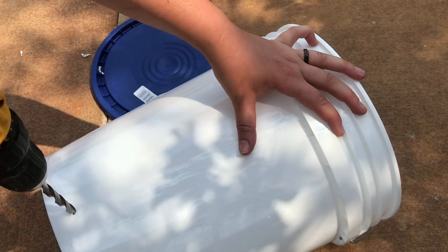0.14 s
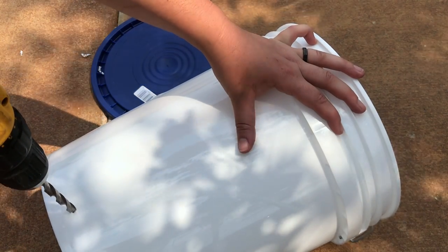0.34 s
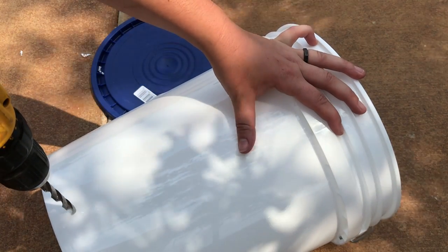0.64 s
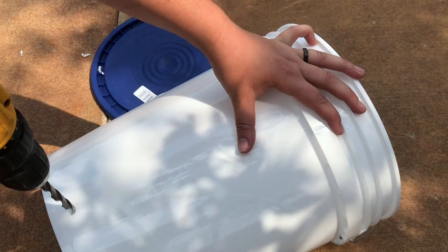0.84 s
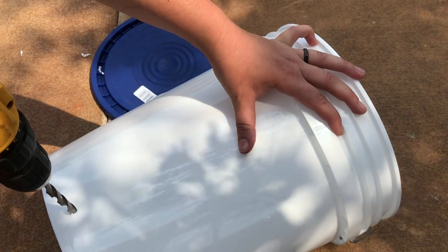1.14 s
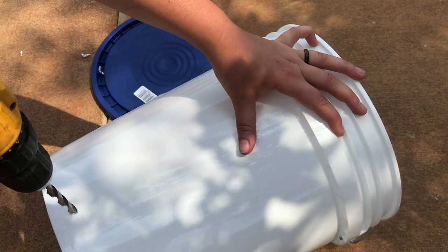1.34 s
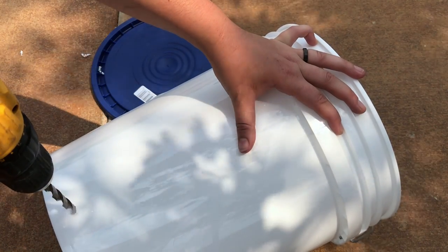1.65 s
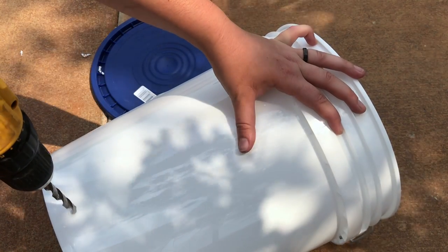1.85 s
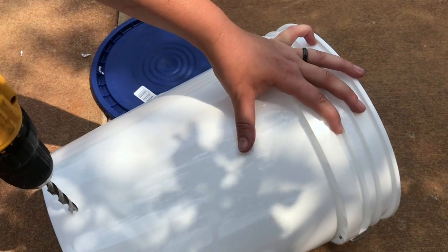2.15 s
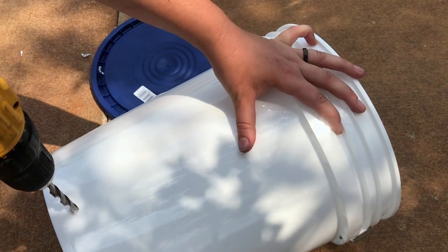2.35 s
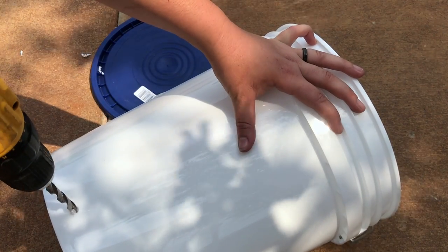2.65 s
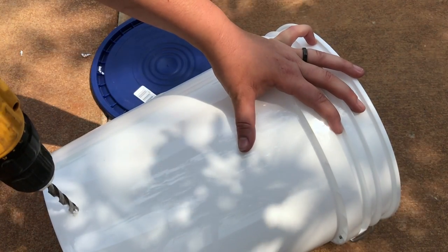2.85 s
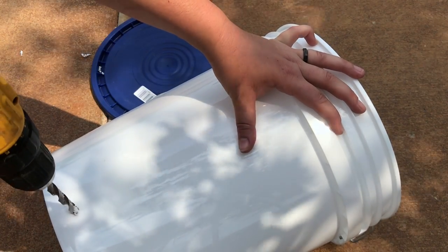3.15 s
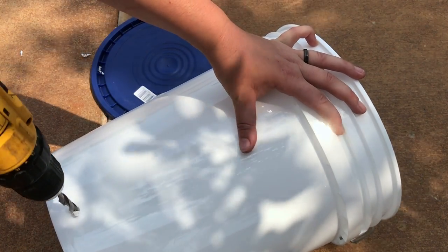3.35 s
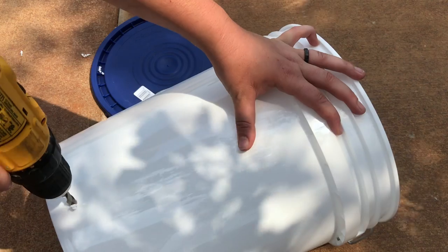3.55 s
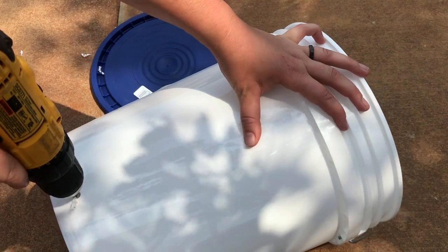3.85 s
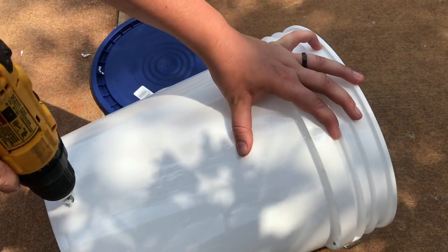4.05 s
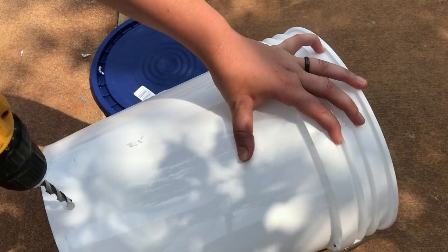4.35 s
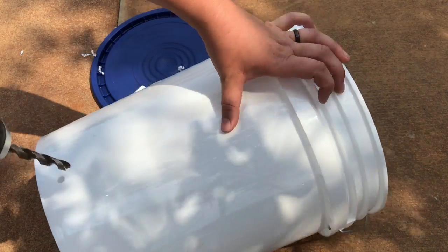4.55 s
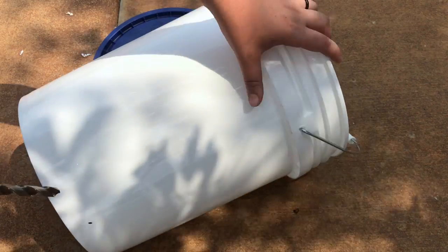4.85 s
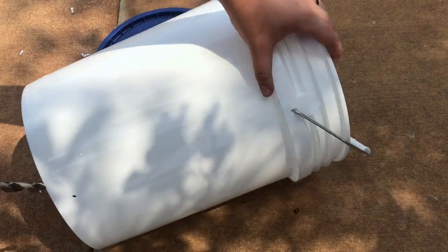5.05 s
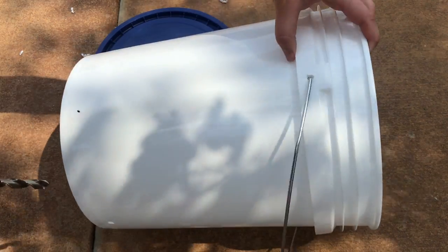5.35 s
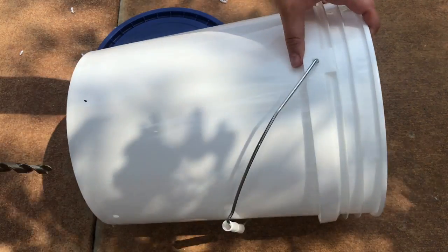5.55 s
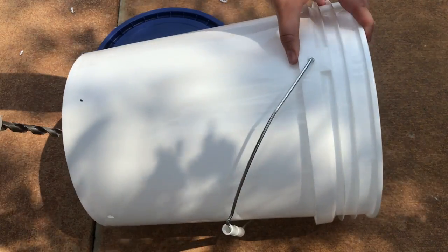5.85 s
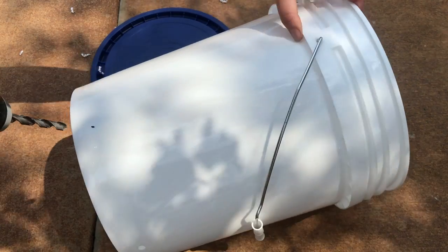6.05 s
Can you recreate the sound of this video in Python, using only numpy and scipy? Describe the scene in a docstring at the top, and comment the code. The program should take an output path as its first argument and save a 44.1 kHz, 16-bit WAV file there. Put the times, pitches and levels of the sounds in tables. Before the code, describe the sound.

Outdoors in buffeting wind, a drill's high whine bites through plastic and stops, followed by a short squeak, gritty scraping and hollow bucket knocks.

```python
"""On a patio, one microphone in buffeting wind: a cordless drill bores through a plastic bucket's wall.
Tones locked to the rotor whine, sag as the bit bites and coast to a stop, over coloured gear and brush noise.
The bit breaks through, snags, and squeaks in gliding sines as it is drawn back out.
Then the bucket rolls over gritty concrete, a stream of random grains, and its rim and wire handle clatter
as noise bursts with ringing modes. The wind is low noise swelling in gusts over a quiet yard."""
import sys
import numpy as np
from scipy import signal
from scipy.fft import rfft, irfft
from scipy.io import wavfile
from scipy.ndimage import uniform_filter1d, map_coordinates

SR = 44100
rng = np.random.default_rng(int(sys.argv[2]) if len(sys.argv) > 2 else 0)


def dump(signal):
    """Clip the signal to [-1, 1] and save it as 16-bit WAV at the path in sys.argv[1]."""
    limited = np.clip(np.atleast_2d(signal).T, -1, 1)
    pcm = np.round(limited * 32767).astype(np.int16)
    wavfile.write(sys.argv[1], SR, pcm)


N = 272979
T = np.arange(N) / SR  # time in seconds

# cycles of the whine, and meetings of the first gear's teeth, per turn of the rotor
SLOTS, MESH_ORDER = 12, 13.1
RELEASE_S = 4.08  # the trigger is let go
# motor speed while the trigger is held, as the pitch of its whine: start_s [s], pitch_hz [Hz]
SPEED = [(0, 1361), (.12, 1482), (.25, 1562), (.55, 1642), (.8, 1689), (1.25, 1728), (1.5, 1713),
         (1.92, 1696), (2.08, 1654), (2.34, 1462), (2.67, 1471), (3.05, 1342), (3.26, 1185), (3.35, 1303),
         (3.47, 1356), (3.88, 1296), (3.97, 1346), (4.08, 1518)]
# resonances of the drill housing: centre_hz [Hz], width_hz [Hz], height_db [dB]
HOUSING = [(1030, 190, 4.5), (1457, 180, 4), (2260, 380, 5), (3280, 480, 5.5), (4870, 1400, 8),
           (9060, 1150, 8)]


def amp(db):
    """Decibels to gain."""
    return 10 ** (np.asarray(db) / 20)


def unit(x):
    """Scales to an rms of one."""
    return x / np.sqrt(np.mean(x ** 2) + 1e-20)


def follow(table):
    """The columns of a time table, interpolated sample by sample."""
    s, *columns = np.transpose(table)
    return [np.interp(T, s, column) for column in columns]


def colour(x, points, bumps=()):
    """Minimum-phase filter of unit power from a dB spectrum and optional resonances (Hz, width Hz, dB)."""
    size = 8192
    hz = np.fft.rfftfreq(size, 1 / SR)
    point_hz, level_db = np.transpose(points)
    db = np.interp(np.log(hz + 1), np.log(point_hz + 1), level_db)
    for centre, width, height in bumps:
        db = db + height / (1 + (2 * (hz - centre) / width) ** 2)
    log_gain = np.log(amp(np.r_[db, db[-2:0:-1]]))
    # the Hilbert transform of the log gain gives the phase that keeps the filter causal
    response = np.exp(np.conj(signal.hilbert(log_gain)))[:len(hz)]
    taps = irfft(response)[:size // 2]
    return signal.oaconvolve(x, taps / np.linalg.norm(taps))[:len(x)]


def wander(hz):
    """Smooth random drift of unit rms, holding only rates below hz."""
    slow = np.fft.rfftfreq(N, 1 / SR) < hz
    return unit(irfft(rfft(rng.standard_normal(N)) * slow, N))


def steadied(x, span_s):
    """Evens out the swells of a noise that are longer than the span."""
    power = uniform_filter1d(x ** 2, max(int(span_s * SR), 2))
    return x / np.sqrt(abs(power) + 1e-9)


def add(mix, s, sound):
    """Mixes a sound in at a time in seconds."""
    part = mix[round(s * SR):][:len(sound)]
    part += sound[:len(part)]


def burst(t, t60):
    """A dying spray of tiny contacts: noise that falls 60 dB in t60 seconds."""
    return rng.standard_normal(len(t)) * amp(-60 * t / t60)


def motor_state():
    """Rotor turns, then shares 0-1: speed left while coasting, load read from the sagging pitch, plunge."""
    free_hz, sag_hz = 1770, 443  # whine with no load, and its drop at full load
    coast_s = .5  # friction stops the rotor in this time
    through_s, plunge_s = 3.23, 0.17  # the bit breaks through; time constant of the drill plunging nearer
    hz = follow(SPEED)[0]
    spin = 1 - np.clip((T - RELEASE_S) / coast_s, 0, 1)
    unsteady = 1 + 0.001033 * wander(43.4)
    turns = np.cumsum(hz * spin * unsteady) / SR / SLOTS
    load = np.clip((free_hz - hz) / sag_hz, 0, 1)
    plunge = 1 - np.exp(-np.maximum(T - through_s, 0) / plunge_s)
    return turns, spin, load, plunge


def tone_levels(spin, load, plunge):
    """Gains of whine, mesh and overtones: load softens, the plunge swells the mesh, cutting hardens it."""
    # how hard the flutes cut, through the wall and then reaming the hole: start_s [s], cut [share 0-1]
    cutting = [(0, 0), (2.0, 0.18), (2.25, 0.42), (3.0, 0.26), (3.23, 1), (3.36, 0.15), (3.55, 0.14),
               (3.88, 0.98), (4.08, 0.2)]
    cut = follow(cutting)[0]
    stopping = 1 - spin
    # the mesh overtone blooms as it glides through a resonance of the housing
    centre, width, _ = HOUSING[3]
    overtone_hz = 2 * follow(SPEED)[0] * MESH_ORDER / SLOTS
    bloom_db = 8 / (1 + ((overtone_hz - centre) / width) ** 2)
    whine_db = -41.0 - 5.5 * load - 3 * cut - 22 * stopping
    # without torque the teeth meet softly
    mesh_db = -56 - 4 * load + 13 * plunge - 50 * stopping
    overtone_db = -64 + 14 * cut + bloom_db + 2 * wander(12) - 50 * stopping
    return [spin * amp(db) for db in (whine_db, mesh_db, overtone_db)]


def tones(turns, levels, rough=0.09, mesh_rough=0.29):
    """Slot whine, fan and rotor orders, and the rougher mesh of the first gear stage, as sines of rotor angle."""
    # tones of the spinning rotor and its fan: order [cycles per turn], level_db [dB re the whine gain]
    rotor = [(3, -20), (5, -10), (7, -21), (13, -26), (30, -19.5), (35, -27), (40, -21)]
    whine, mesh, overtone = levels

    def tone(cycles, shake):
        """A sine of unit rms with a random phase and an unsteady level."""
        return np.sqrt(2) * np.sin(2 * np.pi * (cycles + rng.random())) * (1 + shake * wander(50))

    out = whine * amp(-1) * tone(SLOTS * turns, rough)
    for order, db in rotor:
        out += whine * amp(db) * tone(order * turns, rough)
    teeth = MESH_ORDER * turns + 0.039 * wander(140)  # backlash jitters the teeth
    for harmonic, gain in enumerate([mesh * amp(-1), overtone, overtone * amp(-7)], 1):
        out += gain * tone(harmonic * teeth, mesh_rough)
    return out


def rattle(turns, spin, load):
    """Gears and brushes: a roughness that repeats each turn, loose chatter, hiss and a flickering squeal."""
    # noises before the trims below: start_s [s], gear_db [dB], hiss_db [dB], squeal_db [dB]
    running = [(0, -43.5, -59, -60), (.5, -42, -54, -54), (1.35, -42, -56, -53), (2.2, -40, -54, -54),
               (2.5, -41, -57, -57), (3.05, -41, -57, -59), (3.23, -39.5, -58, -60), (3.29, -46, -61, -63),
               (3.42, -42, -61, -67), (3.7, -41, -56, -86), (4.08, -42, -51.5, -59)]
    # gear rattle spinning freely: pitch_hz [Hz], density_db [dB per Hz]
    free = [(250, -26.5), (500, -12.5), (780, -7.5), (970, -12), (1520, -5), (1970, -6), (2980, -10.5),
            (4120, -14.5), (6390, -18.5), (8830, -19.5), (11000, -38), (15000, -46)]
    # gear rattle under load: pitch_hz [Hz], density_db [dB per Hz]
    loaded = [(250, -6.5), (500, -7.5), (670, -7), (1100, -8.5), (1500, -4.5), (2000, -3.5), (3500, -11.5),
              (4810, -10.5), (6560, -13), (8940, -14), (11000, -26.5), (15000, -25)]
    gear_db, hiss_db, squeal_db = follow(running)

    size = 256  # points of roughness around one turn
    profile = rng.standard_normal(size)
    worn = unit(map_coordinates(profile, [turns % 1 * size], order=3, mode="grid-wrap"))
    beat = 1 + 0.17 * np.sin(2 * np.pi * turns) + 0.12 * wander(120)
    repeating = amp(-8) * worn * (1 + 0.55 * wander(15))
    chatter = unit(beat * rng.standard_normal(N) + repeating)
    gears = (1 - load) * colour(chatter, free, HOUSING) + load * colour(chatter, loaded, HOUSING)

    hiss = colour(beat * rng.standard_normal(N), [(7000, -51), (10000, 1.5), (13000, 4.5), (15700, -17.0)])
    squeal = colour(rng.standard_normal(N), [(9000, -43), (14300, -23)], [(14300, 1100, 25)])
    squeal = unit(squeal * amp(3 * wander(110)))
    unpowered_db = -4 * np.clip((T - RELEASE_S) / .03, 0, 1)  # no current, fewer sparks
    # each noise dies at its own rate as the rotor slows
    out = spin ** 1.28 * amp(gear_db) * gears
    out += spin ** 1.9 * amp(hiss_db + unpowered_db - 1) * hiss
    return out + spin ** 1.5 * amp(squeal_db + 1) * squeal


def chopper():
    """The speed controller switches the current and sings at a fixed pitch while the trigger is held."""
    # the switching tones: pitch_hz [Hz], level_db [dB re each other]
    partials = [(3909, 0), (7818, -12), (11727, -25)]
    # level of the whole song: start_s [s], level_db [dB]
    switching = [(0, -48.5), (.4, -52), (2, -51), (2.45, -54.5), (3.2, -57), (3.4, -52.5), (4.07, -46)]
    held = np.clip((RELEASE_S - T) / 0.009, 0, 1)
    song = sum(amp(db) * np.sin(2 * np.pi * hz * T) for hz, db in partials)
    return held * amp(follow(switching)[0]) * unit(song) * (1 + 0.049 * wander(40))


def ring(t, detune=0.0046):
    """The bucket's decaying modes, weighted and slightly bent anew by every place of impact."""
    # the bucket's modes: pitch_hz [Hz], level_db [dB re each other], t60_s [s]
    modes = [(441, 3, 0.19), (646, -10, 0.39), (813, 2, 0.16), (855, -13, 0.03), (950, -5, 0.13),
             (1133, -6.5, 0.047), (1275, 2, .06), (1419, 6.5, 0.089), (1510, -12, 0.059),
             (1750, -17, 0.088), (2169, 4, 0.038), (2360, -14.5, 0.034), (2350, -19, 0.089),
             (2660, 1, 0.057), (3270, -2.5, 0.069), (10100, -21.5, 0.067), (14800, -34, .06)]
    hz, db, t60 = np.transpose(modes)[:, :, None]
    weight = rng.choice([-1, 1], hz.shape) * rng.uniform(0.18, 1.13, hz.shape)
    bent_hz = hz * (1 + detune * rng.standard_normal(hz.shape))
    partials = weight * amp(db - 60 * t / t60) * np.sin(2 * np.pi * bent_hz * t)
    return partials.sum(0) / np.linalg.norm(amp(db))


def snags():
    """The bit's flutes catch the edge of the hole: the wall snaps, flexes in a low thump and rings."""
    # the catches: start_s [s], level_db [dB], thump_db [dB re level]
    catches = [(3.221, -39, -15), (3.247, -27, 4), (4.076, -26.5, -4), (4.082, -23, 19.5), (4.091, -33, 9)]
    # colour of the snap: pitch_hz [Hz], density_db [dB per Hz]
    snap_colour = [(200, -25.5), (450, 13), (650, -1), (850, 9), (1100, -13), (1550, 8.5), (2200, -8.5),
                   (3500, -2.5), (5000, -4.5), (7000, -13), (10000, -23), (15000, -28)]
    thump_hz, thump_t60 = 240, 0.015
    out, t = np.zeros(N), T[:SR // 4]
    for s, db, thump_db in catches:
        snap = colour(burst(t, t60=0.031), snap_colour)
        thump = amp(thump_db - 60 * t / thump_t60) * np.sin(2 * np.pi * thump_hz * t)
        add(out, s, amp(db) * (snap + thump + amp(-6) * ring(t)))
    return out


def squeaks(jitter=0.095):
    """The flutes slip on plastic as they slide out of the hole: short, unsteady glides."""
    # the glides: start_s [s], length_s [s], from_hz [Hz], to_hz [Hz], level_db [dB]
    glides = [(4.229, .07, 807, 1090, -46), (4.291, 0.0695, 1144, 842, -44)]
    out = np.zeros(N)
    for s, length, from_hz, to_hz, db in glides:
        u = np.linspace(0, 1, int(length * SR))
        hz = (from_hz + (to_hz - from_hz) * u) * (1 + jitter * wander(200)[:len(u)])
        add(out, s, amp(db) * np.sin(np.pi * u) * np.sin(2 * np.pi * np.cumsum(hz) / SR))
    return out


def knocks(chips=.35):
    """Rim and handle strike the wall and rebound once: a chattering crack, then the hollow ring."""
    # the blows: start_s [s], level_db [dB], treble_db [dB, a broad lift or cut at 9 kHz]
    blows = [(4.326, -32, -21), (4.576, -41, -20), (4.684, -36.5, -5), (4.733, -33.5, -24),
             (4.79, -39.5, 8), (4.907, -37, 6), (4.944, -46, 2), (5.015, -33.5, -16), (5.083, -37, -5),
             (5.153, -41, 8), (5.228, -39, 1), (5.451, -44.5, -3), (5.504, -23.5, 3), (5.525, -18, 18),
             (5.535, -20, 10), (5.554, -17, 17), (5.568, -14.5, 7), (5.589, -24.5, -6), (5.64, -37, -4),
             (5.667, -34.5, -6), (5.786, -37, 9), (5.979, -30, 6), (5.997, -21.5, 3), (6.012, -19.5, 6),
             (6.038, -23.5, 19), (6.11, -40, 27)]
    # colour of a blow on the wall: pitch_hz [Hz], density_db [dB per Hz]
    wall = [(150, -22), (450, -2.5), (620, -13), (880, 10), (1150, 2.5), (1500, 8), (1950, -3.5),
            (2450, 1.5), (3150, -12.5), (3700, -12), (6000, -34), (10000, -46), (15000, -38.5)]
    rebound_s, rebound_db = .009, -13.5
    out, t = np.zeros(N), T[:SR // 4]
    for s, db, treble_db in blows:
        # random resonances colour each blow by where it lands
        place = [(hz, hz / 5, 3 * rng.standard_normal()) for hz in rng.uniform(880, 4660, size=6)]
        bumps = [(9000, 8100, treble_db)] + place
        for delay, drop_db in [(0, 0), (rebound_s, rebound_db)]:
            contacts = rng.random(len(t)) < chips  # share of samples in contact
            crack = colour(burst(t, t60=0.044) * contacts / np.sqrt(chips), wall, bumps)
            add(out, s + delay, amp(db + drop_db) * amp(-3) * (crack + ring(t)))
    return out


def ticks():
    """Small hard contacts, each with one short ring and a spray of noise."""
    # the contacts: start_s [s], level_db [dB], pitch_hz [Hz], t60_s [s]
    contacts = [(3.135, -35, 1880, 0.13), (4.5193, -35.5, 2850, 0.016), (4.793, -40, 3650, 0.013),
                (5.97, -49, 8350, 0.01)]
    out, t = np.zeros(N), T[:SR // 4]
    for s, db, hz, t60 in contacts:
        ping = amp(-60 * t / t60) * np.sin(2 * np.pi * hz * t)
        add(out, s, amp(db) * (ping + 0.31 * burst(t, t60=0.0098)))
    return out


def scraping(sag_db_per_s=20, release_db_per_s=230, bite_s=.004):
    """Gains of grind, rasp and fizz: each scrape bites, sags and lets go, over the light roll of the rim."""
    # scrapes of the rim on concrete, with the handle's rasp on the wall, before rolling()'s trims: start_s [s],
    # length_s [s], level_db [dB], rasp_db [dB re level], fizz_db [dB re level]
    scrapes = [(4.523, 0.1, -56.5, -15, -6.5), (4.73, 0.012, -40.5, -11, -23),
               (4.94, 0.043, -43.5, -7, -27), (5.034, 0.054, -43, -11, -26), (5.117, 0.07, -47.5, -16, -13),
               (5.214, 0.11, -41, -21, -16.5), (5.513, 0.025, -32.5, 5, -12.5),
               (5.744, 0.058, -42, -9, -19), (5.967, 0.041, -36, -13, -16.5)]
    # the roll sets in with the first scrape
    roll = amp(-64) * np.clip((T - scrapes[0][0]) / bite_s, 0, 1)
    power = np.outer(amp([0, -8, -16]), roll) ** 2
    for s, length, db, rasp_db, fizz_db in scrapes:
        t = np.maximum(T - s, 0)
        falling_db = sag_db_per_s * t + release_db_per_s * np.maximum(t - length, 0)
        stroke = np.minimum(t / bite_s, 1) * amp(db - falling_db)
        power += np.outer(amp([0, rasp_db, fizz_db]), stroke) ** 2
    return np.sqrt(power)


def rolling(grains_per_s=1000):
    """Grit crunches under the rolling rim and the handle rubs the wall; both sound through the bucket."""
    # colour of the rim grinding on concrete: pitch_hz [Hz], density_db [dB per Hz]
    grit = [(200, 8.5), (450, 12.5), (680, 6), (850, 20.5), (1100, 5), (1400, 16), (1900, 4.5),
            (2650, -35.5), (3100, -12), (3600, -25), (5500, -36), (15000, -55.5)]
    # colour of the grit's fizz: pitch_hz [Hz], density_db [dB per Hz]
    fizz_colour = [(1500, -2.5), (4000, 1.5), (6500, -4.5), (10000, -15), (15000, -21)]
    rasp_hz, rasp_width_hz = 2570, 780  # the handle's rasping resonance as it rubs the wall

    size = amp(1.5 * np.minimum(rng.exponential(1, N), 4)) * rng.choice([-1, 1], N)
    grains = size * (rng.random(N) < grains_per_s / SR)
    grains = steadied(grains, 0.02) * amp(3.5 * wander(45))  # uneven scuffing

    hollow = signal.oaconvolve(grains, ring(T[:SR // 4]))[:N]
    body = unit(colour(grains, grit)) + amp(-5) * unit(hollow)
    edges = [rasp_hz - rasp_width_hz / 2, rasp_hz + rasp_width_hz / 2]
    rasp = signal.sosfilt(signal.butter(4, edges, "bandpass", fs=SR, output="sos"), grains)
    fizz = colour(signal.oaconvolve(grains, burst(T[:SR // 20], t60=0.017))[:N], fizz_colour)

    grind, rasping, gritty = scraping()
    return amp(1) * (grind * unit(body) + rasping * unit(rasp) + gritty * amp(-2) * unit(fizz))


def wind(flutter_db=-29, flutter_slope=1.82, stiff_breeze_db=-22, core=0.67):
    """Eddies on the microphone: a breeze that flutters more as it grows, and brief gusts, over the quiet yard."""
    # the steady breeze, before its eddies: start_s [s], level_db [dB]
    steady = [(0, -35.5), (1.2, -34.5), (2.3, -27.5), (2.9, -32.5), (3.7, -31.5), (4.1, -24.5),
              (4.52, -25.5), (4.7, -21.5), (6.19, -23.5)]
    # gusts: peak_s [s], length_s [s, at half power], rumble_db [dB], flutter_db [dB re rumble]
    gusts = [(0.403, 0.037, -32, -13), (0.64, 0.073, -27, -13.5), (.928, 0.051, -21, -9.5),
             (1.275, 0.033, -31, -3.5), (1.414, 0.095, -26.5, -7.5), (1.775, 0.071, -18.5, -13.5),
             (1.968, .04, -19.5, -14), (2.032, 0.046, -20, -4.5), (2.156, 0.075, -26, 1.5),
             (2.284, 0.04, -25, -12), (2.447, 0.043, -21.5, -8.5), (2.805, 0.031, -23, -9),
             (3.115, 0.037, -19, -7.5), (3.339, 0.053, -25, -5), (3.52, 0.098, -24, -10),
             (3.738, 0.022, -21.5, -11.5), (3.884, 0.055, -20.5, -2.5), (3.99, 0.038, -15.5, -8),
             (4.252, 0.055, -19, -9), (4.464, 0.02, -26, -5), (5.131, 0.054, -22, 3),
             (6.006, 0.052, -18, -6), (6.137, 0.029, -15.5, -10)]
    # colours of the low rumble, the flutter and the yard, each: pitch_hz [Hz], density_db [dB per Hz]
    rumble_colour = [(8, -16), (18, 6.5), (30, 0.5), (50, -1.5), (85, -5), (130, -17.5), (200, -41),
                     (400, -88)]
    flutter_colour = [(60, -14), (120, 5.5), (160, 1), (230, -4.5), (320, -13), (450, -22), (700, -33.5),
                      (1500, -46.5), (4000, -77.5)]
    yard_colour = [(100, -17.5), (500, 2.5), (1300, -15), (2500, -12.5), (5000, -19.5), (10000, -31),
                   (15000, -31.5)]

    breeze_db = follow(steady)[0] + 2 * wander(11)
    rumble_power = amp(breeze_db) ** 2
    flutter_power = amp(flutter_db + flutter_slope * (breeze_db - stiff_breeze_db)) ** 2
    for s, length, db, bright_db in gusts:
        away = (2 * (T - s) / length) ** 2
        rumble_power = rumble_power + .5 ** away * amp(db) ** 2
        # the flutter keeps to the core of the gust
        flutter_power = flutter_power + .5 ** (away / core ** 2) * amp(db + bright_db) ** 2

    rumble = steadied(colour(rng.standard_normal(N), rumble_colour), 0.11) * np.sqrt(rumble_power)
    flutter = steadied(colour(rng.standard_normal(N), flutter_colour), 0.043) * np.sqrt(flutter_power)
    lumps = amp(3 * wander(23))
    yard = amp(-60) * colour(rng.standard_normal(N), yard_colour)
    return rumble + flutter * lumps + yard


def scene():
    """The drill, the bucket and the wind at one microphone."""
    turns, spin, load, plunge = motor_state()
    drill = tones(turns, tone_levels(spin, load, plunge)) + rattle(turns, spin, load) + chopper()
    bucket = snags() + squeaks() + knocks() + ticks() + rolling()
    return (drill + bucket + wind())[None]


def record(dry):
    """A brief closing fade and the recorder's band limit."""
    edge_hz = 15750
    fade = np.clip((T[-1] - T) / 0.015, 0, 1)
    lowpass = signal.firwin(511, edge_hz, window=("kaiser", 9), fs=SR)
    return signal.oaconvolve(dry * fade, lowpass[None], "same")


dry = scene()
out = record(dry)
dump(out)
```